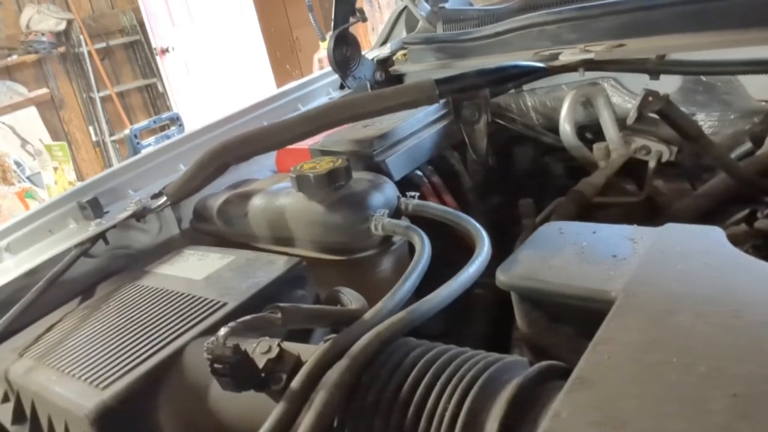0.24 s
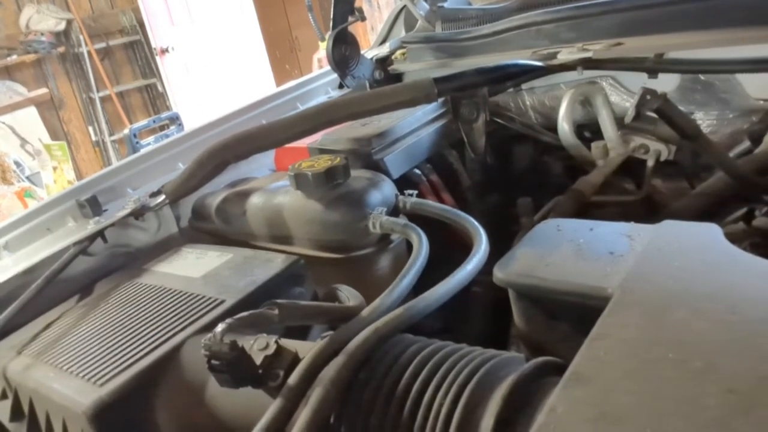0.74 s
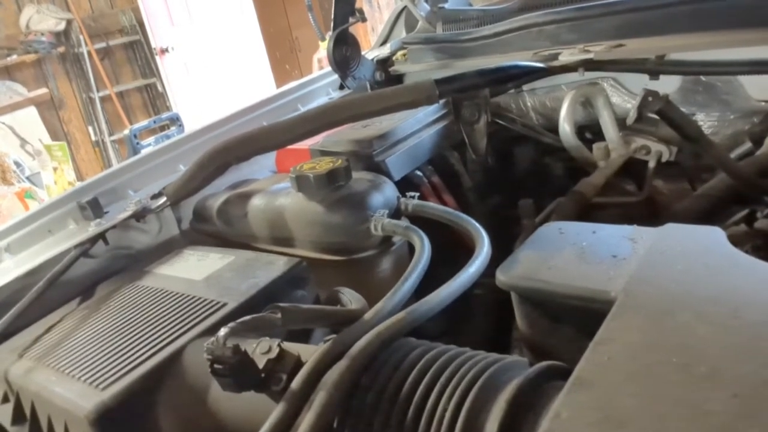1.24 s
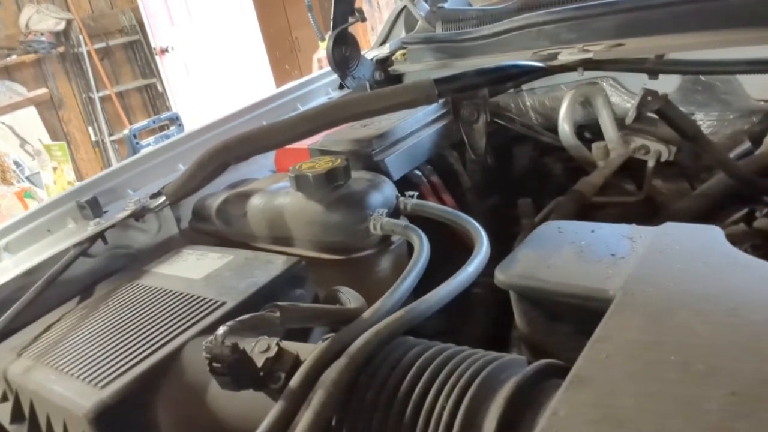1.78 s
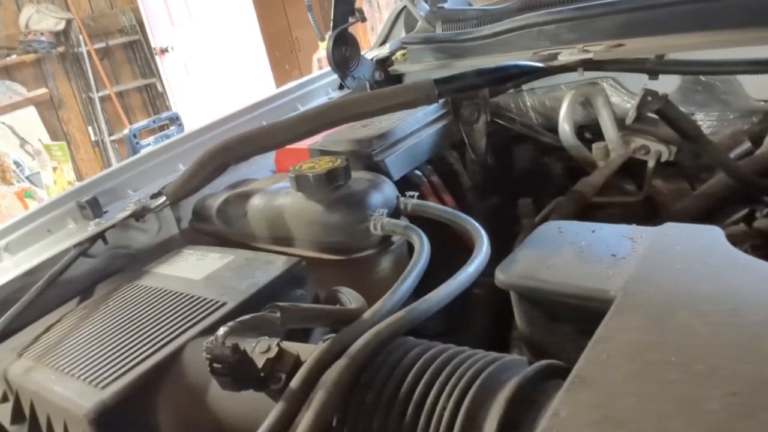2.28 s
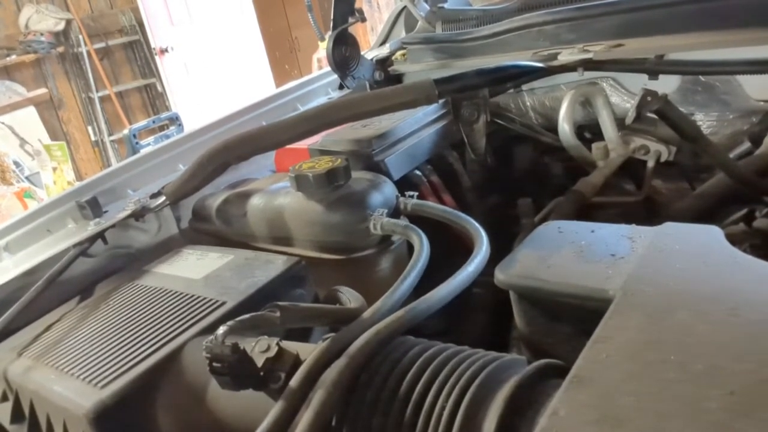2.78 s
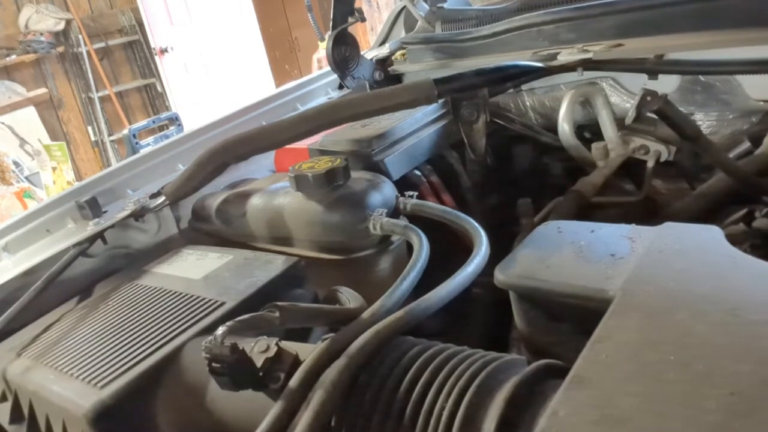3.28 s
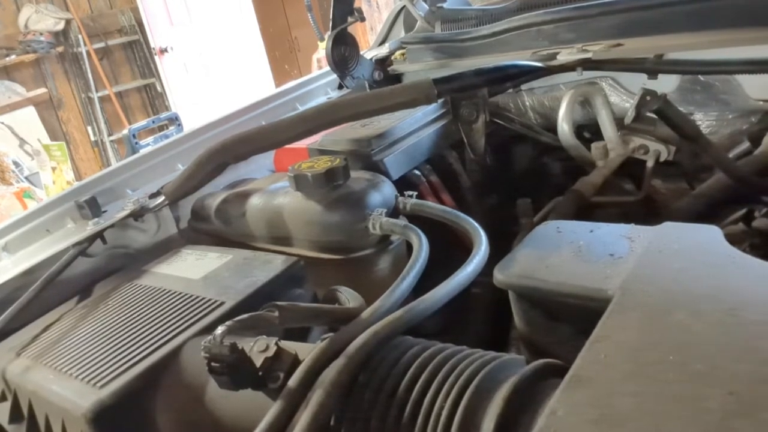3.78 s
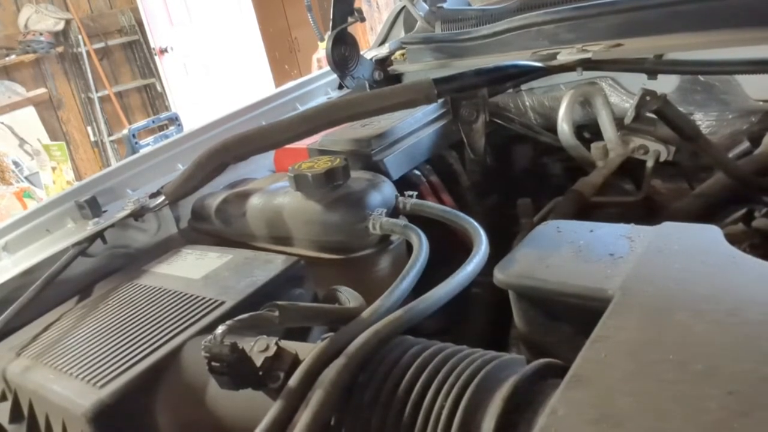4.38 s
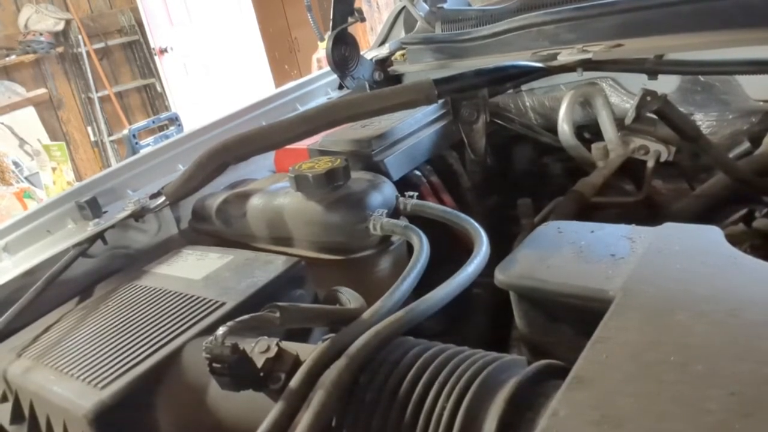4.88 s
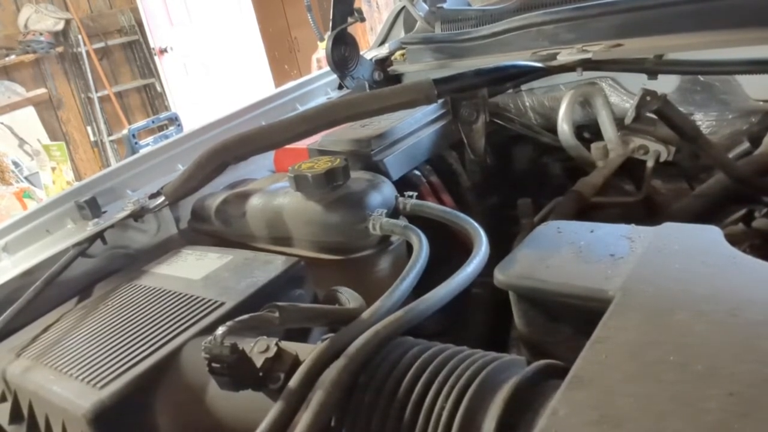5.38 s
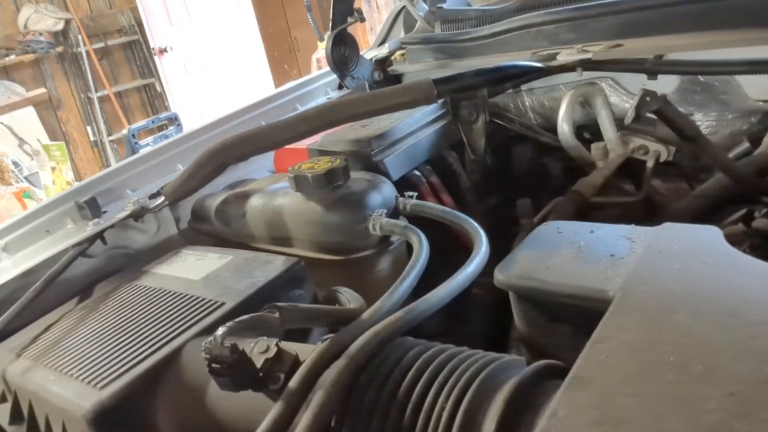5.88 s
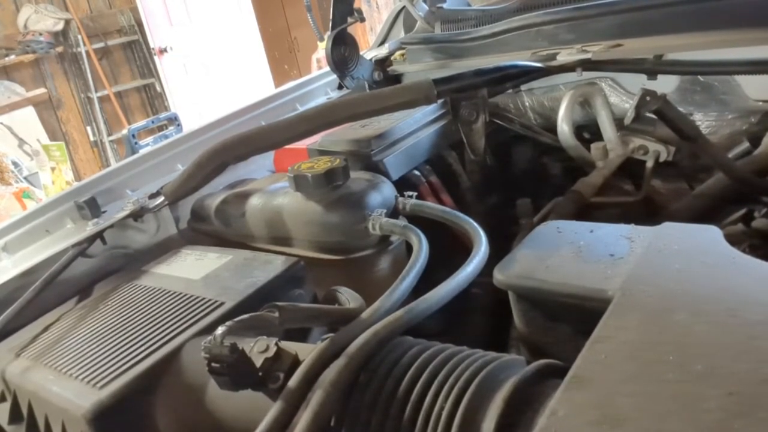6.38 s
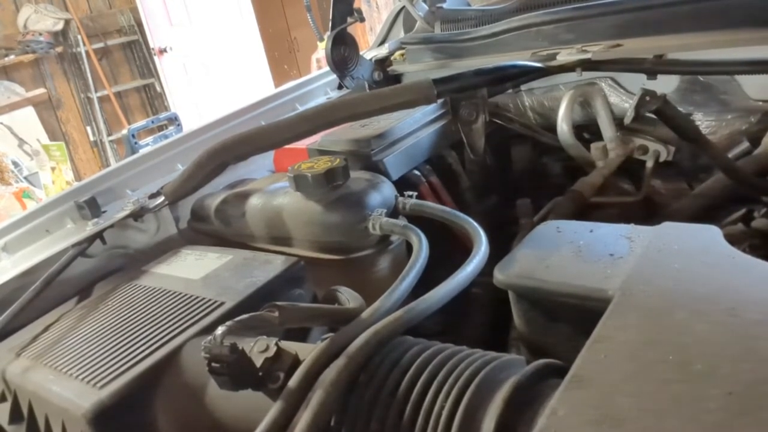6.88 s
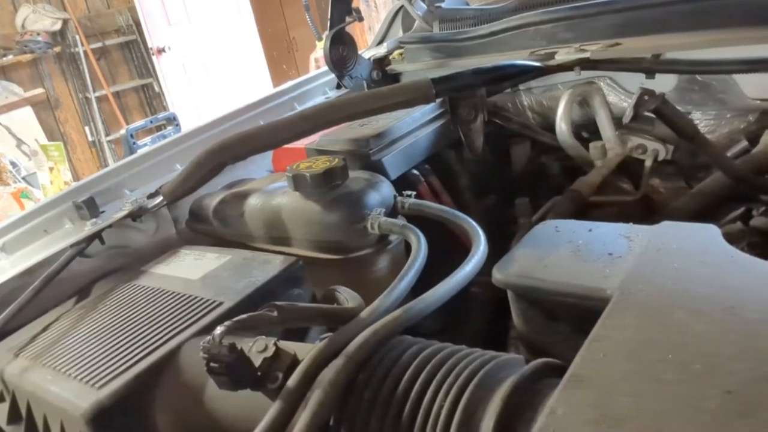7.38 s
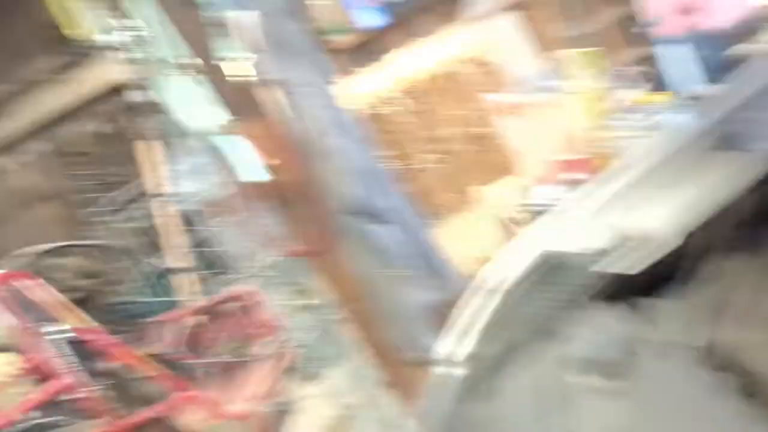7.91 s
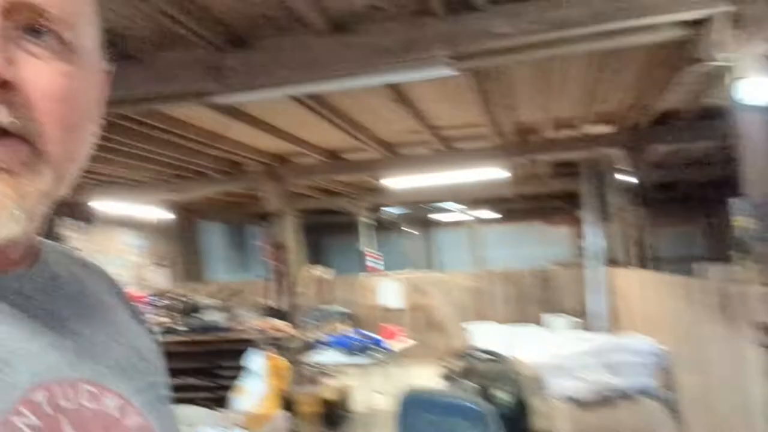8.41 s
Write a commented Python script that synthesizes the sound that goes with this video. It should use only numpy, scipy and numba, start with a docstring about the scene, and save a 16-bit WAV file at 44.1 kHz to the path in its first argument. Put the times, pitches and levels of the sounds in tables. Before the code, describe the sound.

Quiet barn air with soft low rumble, a faint steady hum and a thin, slightly wavering high whine runs throughout. At about 0.5 s a dull, quick cluster of soft bumps sounds close to the microphone. At 1.5 s a cow starts a low rasp that climbs, breaks roughly upward around 2.1 s, and cracks into a thin falsetto from 2.4 s, held until about 3.2 s before sliding down. At 3.4 s it runs into the second moo, rough at first, swelling to the loudest, open, nasal blare around 4 s, holding and then droping in pitch, ending near 5.4 s with a short wooden-room echo. Quiet hum and air follow. At 7.2 s a third moo enters with a tight squealing edge, climbs from a low rasp to a steady blare, somewhat quieter than the second, and is still sounding at the cut-off near 8.65 s as the low rumble thins.

```python
"""A cow bellows three times in a wooden barn. Each moo starts as a low rasp and climbs to a clear blare;
the first one cracks into a thin falsetto that slides down into the second.
Before them something bumps dully close by; a machine hums and whines faintly all along in the still air.
Pulses and puffs of the vocal folds sound through a gliding throat and mouth, soft blows ring low modes,
sines make the machine, coloured noise the air, and a tail of fading noise the barn's echo."""
import sys
import numpy as np
from scipy import signal
from scipy.fft import rfft, irfft, next_fast_len
from scipy.io import wavfile
from scipy.ndimage import uniform_filter1d, minimum_filter1d
from numba import njit

SR = 44100
rng = np.random.default_rng(int(sys.argv[2]) if len(sys.argv) > 2 else 0)


def wrap_up_sound(samples):
    """Save the sound to the file named by the first command line argument, as 16-bit audio."""
    columns = np.atleast_2d(samples).T
    # keep every value between -1 and 1, then stretch to whole-number steps
    tamed = np.clip(columns, -1, 1)
    steps = np.round(tamed * 32767).astype(np.int16)
    wavfile.write(sys.argv[1], SR, steps)


N = 381465
TIME = np.arange(N) / SR

# Edges of the throat regions: the boom, then the low, middle and high part of the blare [Hz].
THROAT_EDGES_HZ = [140, 520, 950, 2300, 6500]


def from_db(db):
    """Decibels to gain."""
    return 10 ** (np.asarray(db) / 20)


def rms_one(x):
    """Scale to rms 1."""
    return x / np.sqrt(np.mean(x ** 2) + 1e-20)


def in_time(rows, t):
    """The columns of a curve table at times t, held beyond its ends."""
    s, *columns = np.transpose(rows)
    return [np.interp(t, s, column) for column in columns]


def at_hz(points, hz):
    """Read a spectrum on a log-frequency axis."""
    f, value = np.transpose(points)
    return np.interp(np.log(np.maximum(hz, 1)), np.log(f), value)


def shaped(x, gain_at):
    """Filter by a gain given as a function of frequency."""
    size = next_fast_len(x.shape[-1] + 4096)
    hz = np.arange(size // 2 + 1) * SR / size
    return irfft(rfft(x, size) * gain_at(hz), size)[..., :x.shape[-1]]


def band(x, low_hz, high_hz, order=2):
    """Butterworth band-pass."""
    edges_hz = [low_hz, min(high_hz, SR / 2 - 1)]
    return signal.sosfilt(signal.butter(order, edges_hz, "band", fs=SR, output="sos"), x)


def drift(rate, size):
    """Slow random curve of spread 1, changing about `rate` times a second."""
    r = np.exp(-40 * np.pi * rate / SR)
    # one value for every 20 samples, after a run-in of 2000 values
    noise = rng.standard_normal(size // 20 + 2002)
    slow = signal.lfilter([1], [1, -2 * r, r * r], noise)[2000:]
    return np.interp(np.arange(size) / 20, np.arange(len(slow)), rms_one(slow))


def stereo_noise(likeness, size):
    """Noise in two channels, alike as far as the table says."""
    mid, side = rng.standard_normal((2, size))
    mid = shaped(mid, lambda hz: np.sqrt(1 + np.clip(at_hz(likeness, hz), -1, 1)))
    side = shaped(side, lambda hz: np.sqrt(1 - np.clip(at_hz(likeness, hz), -1, 1)))
    return np.array([mid + side, mid - side])


def late(x, lag_s):
    """Delay one channel."""
    return np.interp(TIME - lag_s, TIME, x)


def background(air_db=-36, rumble_top_hz=140):
    """Still air as coloured stereo noise, whose low rumble is turned down along a curve."""
    # Steady air of the barn. Each row: frequency in Hz, relative density in dB per Hz.
    air_colour = [(25, -38), (42, -15), (62, 1), (100, -3), (125, 0.3), (160, -5), (240, -1), (300, -7),
                  (400, -12), (490, -11), (560, -17), (900, -18), (1200, -21), (1800, -21), (2700, -24),
                  (3000, -21), (3900, -31), (12500, -30), (15400, -33)]
    # How alike left and right hear the air. Each row: frequency in Hz, likeness 0-1.
    air_likeness = [(60, 0.98), (150, 1), (380, 0.19), (950, 0.081), (2370, 0.027), (5940, 0.26),
                    (14900, 0.037)]
    # The low rumble thins as the microphone is swung round. Each row: time in seconds, gain in dB.
    rumble_gain = [(0, -4), (7.6, -2.5), (8.2, -7), (8.65, -11)]
    air = shaped(stereo_noise(air_likeness, N), lambda hz: from_db(at_hz(air_colour, hz)))
    air = from_db(air_db) * rms_one(air)
    rumble = shaped(air, lambda hz: 1 / (1 + (hz / rumble_top_hz) ** 10))
    return air + rumble * (from_db(in_time(rumble_gain, TIME)[0]) - 1)


def machine():
    """Hum and whine of a machine: sine lines whose frequencies waver at random."""
    # Steady hum lines. Each row: mean frequency in Hz, level in dB rms.
    hum = [(129.2, -51.5), (258.4, -51.5), (495.3, -55.5), (10002, -82)]
    # The gliding whine. Each row: time in seconds, mean frequency in Hz, level in dB rms.
    whine = [(0, 3100, -59), (1.5, 3075, -56.5), (3.0, 3085, -53.5), (5.6, 2930, -59.5), (8.65, 3145, -60)]
    whine_hz, whine_db = in_time(whine, TIME)
    lines = [(hz + 2.5 * drift(8, N), db) for hz, db in hum]
    lines.append((whine_hz + 14 * drift(20, N), whine_db))
    return sum(np.sqrt(2) * from_db(db) * np.sin(2 * np.pi * np.cumsum(hz) / SR) for hz, db in lines)


def bump(scatter_db=4.0, pivot_hz=200, scuff_s=0.015, scuff_db=-21, scuff_hz=(1620, 1980), bass_cut_hz=42):
    """A quick run of soft contacts thumps the low modes; each one scuffs a little."""
    # Dull bumps. Each row: time in seconds, relative level in dB, hardness of the contact in dB per octave.
    contacts = [(0.462, -33, 2), (0.473, -26, 3), (0.481, -26, -1), (0.489, -21.5, 1), (0.513, -26, -6.5),
                (0.527, -29, -1), (0.537, -27, 0), (0.572, -37, -5), (0.595, -33.5, -8)]
    # What the bumped thing rings with. Each row: frequency in Hz, relative level in dB, t60 in seconds.
    modes = [(66, -7, 0.077), (109, -5.5, 0.083), (165, -6, 0.053), (274, -3, 0.078), (365, -8, .027),
             (523, -6, 0.027), (830, -17, .015)]
    s, blow_db, hardness_db = np.transpose(contacts)

    def clicks(db):
        """One single-sample blow per contact."""
        train = np.full(N, 1e-18)
        train[(s * SR).astype(int)] = from_db(db)
        return train

    ringing = 0
    for hz, mode_db, t60 in modes:
        # a harder contact drives the higher modes more; each blow lands a little differently
        tilt_db = hardness_db * np.log2(hz / pivot_hz)
        blows = clicks(blow_db + mode_db + tilt_db + scatter_db * rng.standard_normal(len(s)))
        r, w = from_db(-60 / (t60 * SR)), 2 * np.pi * hz / SR
        ringing = ringing + signal.lfilter([0, np.sin(w)], [1, -2 * r * np.cos(w), r * r], blows)
    rubbing = signal.lfilter([1], [1, -np.exp(-1 / (scuff_s * SR))], clicks(blow_db + scuff_db))
    scuff = rubbing * rms_one(band(rng.standard_normal(N), *scuff_hz))
    return band(ringing, bass_cut_hz, 1100) + scuff


def vocal_folds(t, pitch, folds, rasp=0.93, flutter=0.94, jitter=.07, waver=0.00305, closing=.17):
    """One pulse per cycle; rough folds stumble in period and strength and let puffs of air through."""
    low_hz, top_hz = THROAT_EDGES_HZ[0], THROAT_EDGES_HZ[-1]
    rough, doubling = in_time(folds, t)
    # jitter and waver are shares of the pitch
    pitch = pitch * (1 + jitter * rough * drift(72.4, len(t)) + waver * drift(11.8, len(t)))
    phase = 2 * np.pi * np.cumsum(pitch) / SR
    # the folds close gradually, which spreads each pulse over its cycle
    pulses = rms_one(sum(np.cos(k * phase + closing * k * k) * np.clip(top_hz / pitch - k, 0, 1)
                         for k in range(1, 52)))
    puffs = rms_one(band(rng.standard_normal(len(t)), low_hz, top_hz) * (1 + np.cos(phase)))
    # the puffs grow towards the treble and blur the upper harmonics
    treble_puffs = 1.2 * band(puffs, 2600, top_hz)
    # strong and weak pulses in turn give lines halfway between the harmonics
    strength = 1 + 2 * doubling * np.cos(phase / 2)
    strength = strength * np.exp(flutter * rough * drift(59, len(t)))
    return strength * (pulses + rough * (rasp * puffs + treble_puffs))


def throat_db(colour, hz):
    """Broad colour of the mouth with narrow resonances on top."""
    # Narrow upper resonances of the long throat. Each row: frequency in Hz, width in Hz, lift in dB.
    resonances = [(1083, 140, 9), (1700, 1100, -2.5), (2280, 38, 1), (2895, 260, 4), (3030, 190, 3),
                  (3770, 320, 4), (4270, 71, 5)]
    return at_hz(colour, hz) + sum(lift_db / (1 + (2 * (hz - centre) / width) ** 2)
                                   for centre, width, lift_db in resonances)


@njit
def ring_through(x, r, cosine):
    """Two-pole resonance of gain about 1 whose centre may move from sample to sample."""
    y = np.zeros(len(x))
    for i in range(2, len(x)):
        y[i] = (1 - r * r) / 2 * (x[i] - x[i - 2]) + 2 * r * cosine[i] * y[i - 1] - r * r * y[i - 2]
    return y


def formant(x, hz, lift_db, width_hz):
    """Lift (or, below 0 dB, dip) a gliding band of the voice."""
    ring = ring_through(x, np.exp(-np.pi * width_hz / SR), np.cos(2 * np.pi * hz / SR))
    return x + (from_db(lift_db) - 1) * ring


def evened(x, even_s=0.073):
    """Hold the running level at rms 1."""
    return x / np.sqrt(np.abs(uniform_filter1d(x ** 2, int(even_s * SR))) + 1e-12)


def moo(pitch_curve, level_curve, mouth_curve, folds, colour, boom_db, blare_db,
        boom_shimmer_db=1.6, blare_shimmer_db=2.5, ramp_s=0.005):
    """The folds sound through the throat: a low boom, and a blare whose colour follows pitch and effort."""
    # Widths of the first and second mouth resonance [Hz].
    widths_hz = (85, 130)
    # As the pitch climbs the blare gets rounder: low, middle, high region [dB per octave of pitch].
    slopes_db = [7, 3.5, -1]
    # The louder she calls, the more the low and high regions stand out: low, middle, high [dB per dB].
    effort_shares = [0.057, 0.0, 0.052]
    during = (TIME >= level_curve[0][0]) & (TIME <= level_curve[-1][0])
    t = TIME[during]
    pitch, = in_time(pitch_curve, t)
    boom_swell_db, blare_swell_db = in_time(level_curve, t)
    first_hz, first_db, second_hz, second_db, treble_db = in_time(mouth_curve, t)

    voice = shaped(vocal_folds(t, pitch, folds), lambda hz: from_db(throat_db(colour, hz)))
    voice = formant(voice, first_hz, first_db, widths_hz[0])
    voice = formant(voice, second_hz, second_db, widths_hz[1])
    boom, *regions = [shaped(voice, lambda hz: 1 / (1 + (hz / high) ** 20) - 1 / (1 + (hz / low) ** 20))
                      for low, high in zip(THROAT_EDGES_HZ, THROAT_EDGES_HZ[1:])]

    octaves = np.log2(pitch / pitch.mean())
    effort_db = blare_swell_db - np.median(blare_swell_db)
    blare = 0
    for region, open_db, slope_db, share in zip(regions, (0, 0, treble_db), slopes_db, effort_shares):
        shimmer_db = blare_shimmer_db * drift(12.0, len(t))
        blare = blare + region * from_db(open_db + slope_db * octaves + share * effort_db + shimmer_db)
    boom_shimmer = boom_shimmer_db * drift(13.0, len(t))

    out = np.zeros(N)
    out[during] = evened(boom) * from_db(boom_db + boom_swell_db + boom_shimmer)
    out[during] += evened(blare) * from_db(blare_db + blare_swell_db)
    ramp_size = int(ramp_s * SR)
    return out * uniform_filter1d(minimum_filter1d(during * 1.0, ramp_size), ramp_size)


def opening():
    """The first moo climbs out of a low rasp as the folds speed up."""
    # Mean pitch. Each row: time in seconds, pitch in Hz.
    pitch = [(1.52, 99.4), (1.78, 140.1), (2.0, 170.4)]
    # Loudness. Each row: time in seconds, relative level of the boom in dB, of the blare in dB.
    level = [(1.52, -51, -43), (1.6, -36.5, -36), (1.66, -36, -29), (1.736, -25, -27), (1.85, -32, -23),
             (1.91, -29, -22.5), (1.95, -25.5, -24), (2.0, -36, -28)]
    # Jaw movement. Each row: time in seconds, first resonance in Hz, its lift in dB,
    # second resonance in Hz, its lift in dB, treble in dB.
    mouth = [(1.6, 600, 7, 1230, 5, 8), (1.73, 650, 0, 1330, 15, 5), (1.8, 621.5, -3, 1290, 10, 2),
             (1.89, 715, 13.5, 1400, 8.5, 6), (2.0, 780, 6, 1410, 4, -4)]
    # State of the folds. Each row: time in seconds, roughness 0-1, period doubling 0-1.
    folds = [(1.52, .1, .02), (1.7, .045, .02), (1.92, .045, .02), (2.0, .18, .1)]
    # Colour of throat and mouth. Each row: frequency in Hz, relative level in dB.
    colour = [(120, -0.5), (265, 17.5), (330, 13.5), (440, 6), (570, -3.5), (780, -2.5), (930, -4.5),
              (1080, -3.5), (1330, 0), (1450, -11), (1600, -11), (1850, -8.5), (2130, -12), (2400, -24),
              (2720, -19), (3000, -34), (3300, -25), (4100, -42), (6500, -37)]
    return moo(pitch, level, mouth, folds, colour, boom_db=1.0, blare_db=-0.85)


def crack():
    """The voice breaks upwards on rough, period-doubled folds."""
    # Mean pitch. Each row: time in seconds, pitch in Hz.
    pitch = [(1.99, 190.2), (2.08, 211), (2.108, 261.8), (2.302, 271.1), (2.38, 349.4)]
    # Loudness. Each row: time in seconds, relative level of the boom in dB, of the blare in dB.
    level = [(1.99, -19, -30), (2.074, -24, -25.5), (2.136, -7.5, -25), (2.274, -16, -30), (2.38, -15, -31)]
    # Jaw movement. Each row: time in seconds, first resonance in Hz, its lift in dB,
    # second resonance in Hz, its lift in dB, treble in dB.
    mouth = [(2.08, 674, 1, 1070, 3.8, 0), (2.2, 730, 5.6, 1360, 1, 0), (2.38, 808, 5.5, 1400, 1.2, 0.0052)]
    # State of the folds. Each row: time in seconds, roughness 0-1, period doubling 0-1.
    folds = [(1.99, .25, .1), (2.1, .32, .25), (2.27, .36, .4), (2.38, .55, .4)]
    # Colour of throat and mouth. Each row: frequency in Hz, relative level in dB.
    colour = [(71, -51), (120, -24), (233, -14), (268, -10.5), (304, -14), (398, -22), (504, -27),
              (669, -9), (947, -15.5), (1060, -17), (1160, -19.5), (1430, -12.5), (1570, -21),
              (2150, -29.5), (5200, -60.5), (6760, -87), (11400, -120)]
    return moo(pitch, level, mouth, folds, colour, boom_db=-6.0, blare_db=4.5)


def falsetto():
    """A thin high voice: fast folds hold their pitch, then slide down."""
    # Mean pitch. Each row: time in seconds, pitch in Hz.
    pitch = [(2.37, 351.7), (2.42, 419.5), (2.44, 399.5), (2.516, 414), (3.09, 410.3), (3.166, 403.7),
             (3.26, 289.8), (3.35, 259.3), (3.43, 249)]
    # Loudness. Each row: time in seconds, relative level of the boom in dB, of the blare in dB.
    level = [(2.371, -26, -25.5), (2.426, -19.5, -35), (2.494, -30, -37), (2.528, -27.5, -30.5),
             (2.69, -20.5, -31), (2.77, -38.5, -34.5), (2.95, -36.5, -34.5), (3.061, -37.5, -38),
             (3.13, -33.5, -36.5), (3.17, -28, -38.5), (3.2, -29.5, -37), (3.27, -27.5, -41),
             (3.366, -14, -29), (3.4, -19, -34), (3.435, -25, -28)]
    # Jaw movement. Each row: time in seconds, first resonance in Hz, its lift in dB,
    # second resonance in Hz, its lift in dB, treble in dB.
    mouth = [(2.5, 825, 1, 1240, 2, 0), (2.95, 830, 4, 1240, 0, 0), (3.15, 810, -4, 1240, 2, 1),
             (3.4, 720, 1, 1450, 5, 0)]
    # State of the folds. Each row: time in seconds, roughness 0-1, period doubling 0-1.
    folds = [(2.37, .55, .4), (2.46, .3, .3), (2.54, .22, .45), (2.64, .36, .45), (2.72, .3, .25),
             (2.82, .11, .03), (3.13, .1, .03), (3.19, .6, .08), (3.32, .22, .2), (3.43, .3, .4)]
    # Colour of throat and mouth. Each row: frequency in Hz, relative level in dB.
    colour = [(200, -11), (255, 17.5), (340, 6), (415, 7.5), (600, -7.5), (840, 0), (1060, -7),
              (1260, -12.5), (1680, -14), (2100, -16), (2500, -24), (2900, -28.5), (3700, -39), (6500, -46)]
    return moo(pitch, level, mouth, folds, colour, boom_db=0.0, blare_db=2.5)


def second_moo():
    """The folds start rough, settle into a blare, and loosen again as the pitch falls."""
    # Mean pitch. Each row: time in seconds, pitch in Hz.
    pitch = [(3.32, 125), (3.42, 132), (3.49, 141), (3.54, 149), (3.64, 160), (3.74, 170.5), (3.84, 176.5),
             (3.94, 184.5), (4.04, 186), (4.17, 191), (4.26, 195), (4.44, 208), (4.53, 212), (4.78, 216),
             (4.89, 222), (4.98, 220), (5.07, 216), (5.17, 209.5), (5.22, 196), (5.27, 170), (5.32, 148),
             (5.42, 125)]
    # Loudness. Each row: time in seconds, relative level of the boom in dB, of the blare in dB.
    level = [(3.32, -48, -42), (3.415, -27, -27), (3.432, -28, -19), (3.55, -24.5, -21),
             (3.65, -17.5, -18.5), (3.71, -17.5, -22.5), (3.85, -15, -13.5), (3.9, -23, -11.5),
             (3.95, -17, -8.5), (4.129, -17, -11.5), (4.259, -18, -11.5), (4.35, -22.5, -20.5),
             (4.51, -22.5, -14), (4.9, -25.5, -17), (5.02, -24.5, -19.5), (5.11, -24, -15.5),
             (5.281, -19.5, -21.5), (5.42, -53, -66)]
    # Jaw movement. Each row: time in seconds, first resonance in Hz, its lift in dB,
    # second resonance in Hz, its lift in dB, treble in dB.
    mouth = [(3.45, 690, 1, 1870, 6.5, 4), (3.72, 690, -28, 1630, 1.9, -1.5), (3.919, 750, 7, 1600, 5.8, 4),
             (4.06, 713, 11, 1630, 12.6, 4.5), (4.27, 715, 22.5, 1780, 6.8, 9),
             (4.4, 644, 4, 1650, 2.5, 1.5), (4.55, 584, 11.5, 1490, 9.1, -5.5),
             (4.78, 766, 1, 1500, 5.3, 0.5), (4.9, 880, 10.5, 1540, 12, -1), (5.12, 854, -1, 1250, 6.6, -3),
             (5.22, 705, 8, 1520, 3.2, -1.5), (5.34, 650, -5, 1600, 10, -9)]
    # State of the folds. Each row: time in seconds, roughness 0-1, period doubling 0-1.
    folds = [(3.42, .35, .2), (3.52, .22, .1), (3.58, .1, .04), (3.8, .065, .03), (4.0, .055, .02),
             (5.17, .055, .02), (5.21, .26, .35), (5.42, .4, .5)]
    # Colour of throat and mouth. Each row: frequency in Hz, relative level in dB.
    colour = [(130, -24), (168, -12.5), (187, 8), (290, 1), (343, 7), (382, 2), (430, -3.5), (480, -14.5),
              (570, -3), (640, 0), (760, 2.5), (870, -4), (960, -13.5), (1080, -4.5), (1200, -7),
              (1300, -2.5), (1520, -2.5), (1750, -1), (1900, -6), (2100, -7.5), (2350, -12.5),
              (3000, -23.5), (4300, -32.5), (4900, -37), (6500, -49)]
    return moo(pitch, level, mouth, folds, colour, boom_db=-4.5, blare_db=-5.5, ramp_s=0.011)


def third_moo():
    """The last moo climbs, its folds roughening now and then, and sounds to the end."""
    # Mean pitch. Each row: time in seconds, pitch in Hz.
    pitch = [(7.27, 114), (7.32, 122), (7.36, 126), (7.44, 138), (7.52, 144), (7.64, 152), (7.72, 162),
             (7.76, 175), (7.8, 181), (7.88, 190), (7.96, 195), (8.04, 198.5), (8.12, 199.5), (8.2, 204),
             (8.28, 204.5), (8.36, 206.5), (8.48, 204), (8.55, 205.5), (8.6, 203.5), (8.65, 206)]
    # Loudness. Each row: time in seconds, relative level of the boom in dB, of the blare in dB.
    level = [(7.21, -51, -39.5), (7.25, -47, -34.5), (7.288, -42.5, -26), (7.38, -33.5, -25.5),
             (7.404, -41.5, -23.5), (7.542, -27, -24), (7.65, -31.5, -24.5), (7.73, -33, -25.5),
             (7.85, -34.5, -23), (7.95, -40, -23.5), (8.104, -37.5, -19.5), (8.22, -47.5, -33),
             (8.322, -35.5, -21.5), (8.45, -42.5, -26.5), (8.55, -41.5, -24), (8.61, -42.5, -33.5),
             (8.65, -47, -34)]
    # Jaw movement. Each row: time in seconds, first resonance in Hz, its lift in dB,
    # second resonance in Hz, its lift in dB, treble in dB.
    mouth = [(7.29, 645, 9, 1950, 1.1, 2), (7.42, 680, -12, 1470, 1.7, -1), (7.6, 780, 10.5, 1520, 3.9, 3),
             (7.87, 720, 0.5, 1530, 6.9, 1), (8.1, 760, 17, 1370, 5.7, 4), (8.25, 800, 8, 1410, 7.3, 0),
             (8.42, 810, 8.5, 1250, 7.2, -3), (8.55, 820, 8.5, 1710, 4.3, -4.5),
             (8.65, 825, 0, 1480, 3.1, 9)]
    # State of the folds. Each row: time in seconds, roughness 0-1, period doubling 0-1.
    folds = [(7.21, .2, .08), (7.42, .1, .05), (7.66, .08, .04), (7.73, .24, .1), (7.8, .12, .05),
             (8.05, .14, .08), (8.15, .08, .03), (8.32, .15, .07), (8.44, .08, .03), (8.65, .09, .03)]
    # Colour of throat and mouth. Each row: frequency in Hz, relative level in dB.
    colour = [(130, -5.5), (163, -4), (185, 6.5), (215, -4.5), (290, 17), (345, 2), (410, 3), (480, -5.5),
              (620, -6), (800, -1.5), (930, -4), (1085, -10.5), (1160, -3), (1400, -3), (1900, -2.5),
              (2600, -16), (3050, -21.5), (3300, -22), (3700, -26), (4260, -28), (4700, -35), (5300, -41),
              (6500, -32)]
    return moo(pitch, level, mouth, folds, colour, boom_db=9.0, blare_db=1.65)


def squealing(voice):
    """Narrow high resonances stand out as the last moo sets in, while the throat is still tight."""
    # The squeal's resonances. Each row: frequency in Hz, width in Hz.
    squeal_resonances = [(2980, 70), (4900, 84)]
    # Their strength; the first value also holds for all the voice before. Each row: time in seconds, lift in dB.
    squeal_lift = [(7.22, -6), (7.27, 18.5), (7.35, 7), (7.42, 0)]
    lift_db, = in_time(squeal_lift, TIME)
    for hz, width_hz in squeal_resonances:
        voice = formant(voice, np.full(N, hz), lift_db, width_hz)
    return voice


def cow(hiss_db=-34.0, hiss_flicker_db=4.5):
    """All the moos, with a little flickering hiss of air that follows their loudness."""
    voice = opening() + crack() + falsetto() + second_moo() + third_moo()
    effort = np.sqrt(np.abs(uniform_filter1d(band(voice, 870, 5000) ** 2, size=2000)))
    hiss = rms_one(band(rng.standard_normal(N), 5200, 15000))
    hiss_gain = from_db(hiss_db + hiss_flicker_db * drift(52, N))
    return squealing(voice) + hiss_gain * effort * hiss


def smoothed_colour(echo, fine_size=30, broad_size=240):
    """Even out the narrow peaks and dips of the echo's spectrum, keeping its broad colour."""
    spectrum = rfft(echo)
    fine, broad = [uniform_filter1d(np.abs(spectrum) ** 2, size) for size in (fine_size, broad_size)]
    return irfft(spectrum * np.sqrt(np.abs(broad) / (np.abs(fine) + 1e-9)), echo.shape[-1])


def barn(x, first_echo_s=0.0071, early_db=10.5, early_t60_s=.09):
    """Diffuse echoes from boards and rafters, dying away octave by octave."""
    # Colour of the echo. Each row: frequency in Hz, relative level in dB.
    echo_colour = [(300, -11.5), (430, -3), (700, -5), (1000, -2.2), (1500, 1.47)]
    # How long the tail lasts. Each row: frequency in Hz, t60 in seconds.
    tail_t60 = [(150, 0.84), (1000, 0.33), (5000, 0.57)]
    # How alike left and right hear the echo. Each row: frequency in Hz, likeness 0-1.
    echo_likeness = [(150, 0.33), (350, 0.87), (700, 1), (1090, 0.62), (1500, .02)]
    t = TIME[:SR * 3 // 4]
    noise, tail = stereo_noise(echo_likeness, len(t)), 0
    for hz in 62.5 * 2 ** np.arange(9):
        octave = shaped(noise, lambda f: np.clip(1 - np.abs(np.log2((f + 1) / hz)), 0, 1))
        slow_decay = from_db(-60 * t / at_hz(tail_t60, hz))
        # the near boards answer first and fast, early_db over the tail
        fast_decay = from_db(early_db - 60 * t / early_t60_s)
        decay = (slow_decay + fast_decay) * (t > first_echo_s)
        tail = tail + octave * decay / np.linalg.norm(decay)
    x = shaped(x, lambda hz: from_db(at_hz(echo_colour, hz)))
    return signal.fftconvolve(x[None], smoothed_colour(tail), axes=1)[:, :N]


def scene(direct_db=0.0, right_lag_s=18 / SR, left_lag_s=22 / SR):
    """The cow, off to one side, reaches the left microphone port first; the bump is close and nearly dry."""
    voice, knock = cow(), bump()
    direct = from_db(direct_db) * np.array([voice, late(voice, right_lag_s)])
    # the bump and the air reach the right port first
    left, right = knock + background()
    nearby = np.array([late(left, left_lag_s), right])
    return direct + barn(voice + .5 * knock) + nearby + machine()


def record(dry, cutoff_hz=15500):
    """The top is cut steeply, over the last 200 Hz below the cutoff."""
    return shaped(dry, lambda hz: np.clip((cutoff_hz - hz) / 200, 0, 1))


dry = scene()
out = record(dry)
wrap_up_sound(out)
```